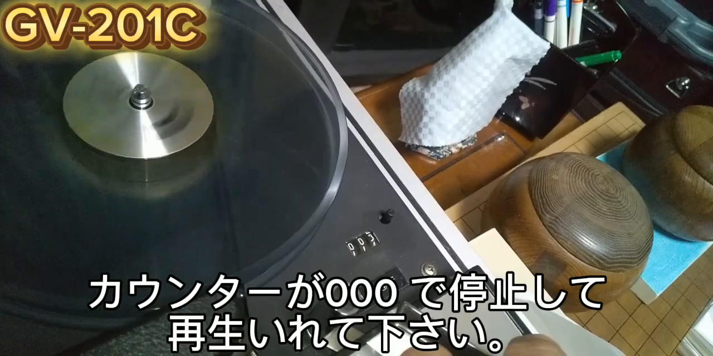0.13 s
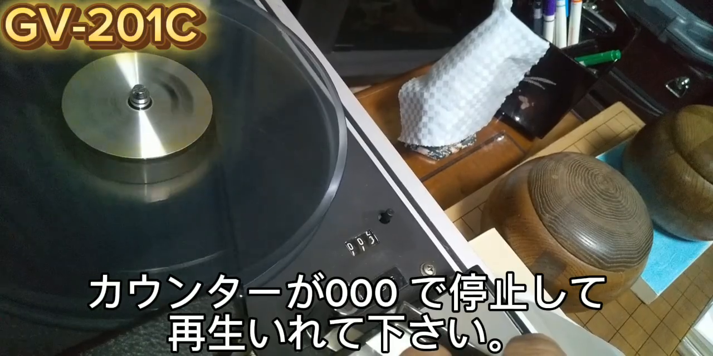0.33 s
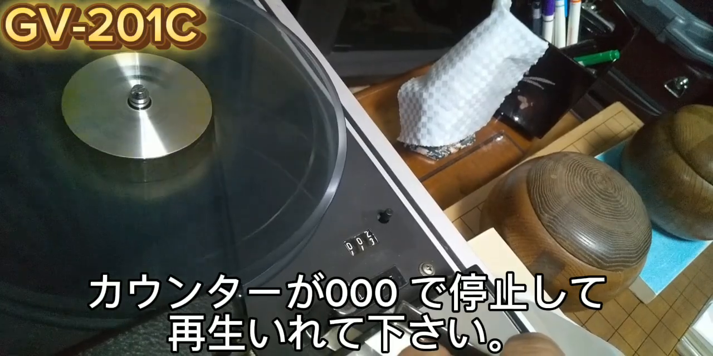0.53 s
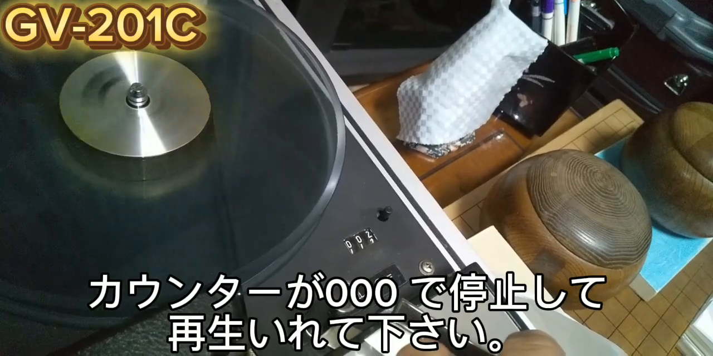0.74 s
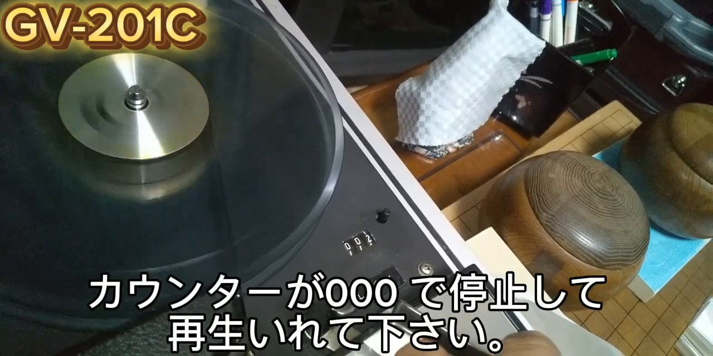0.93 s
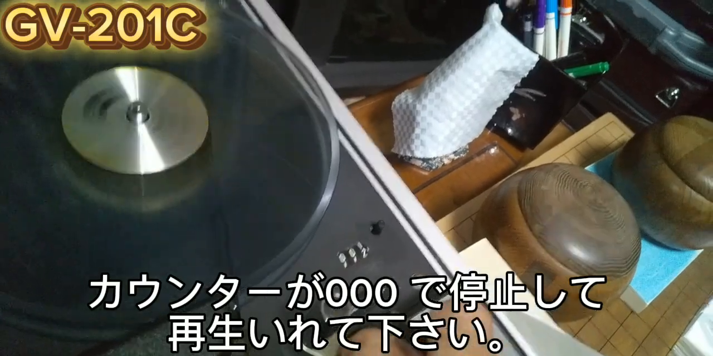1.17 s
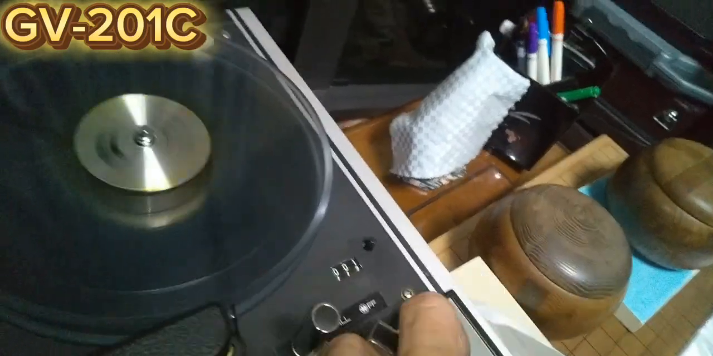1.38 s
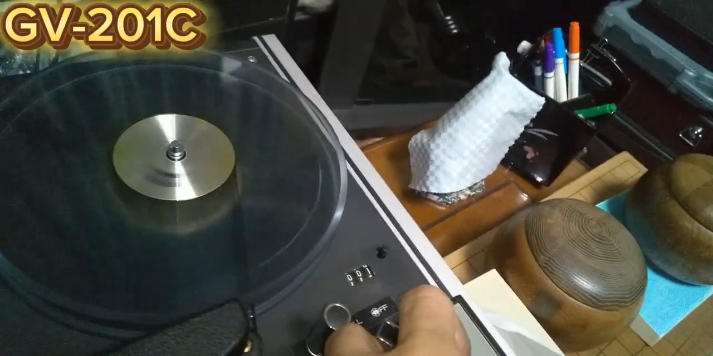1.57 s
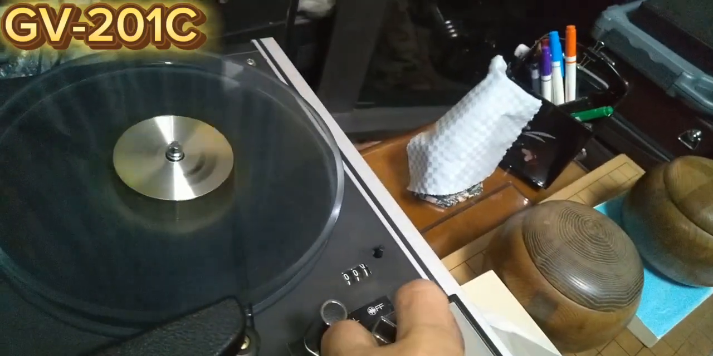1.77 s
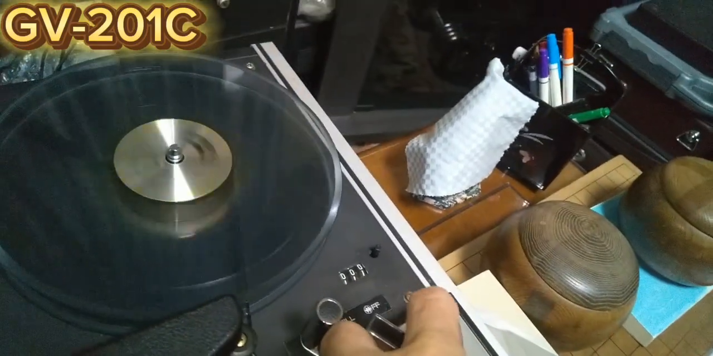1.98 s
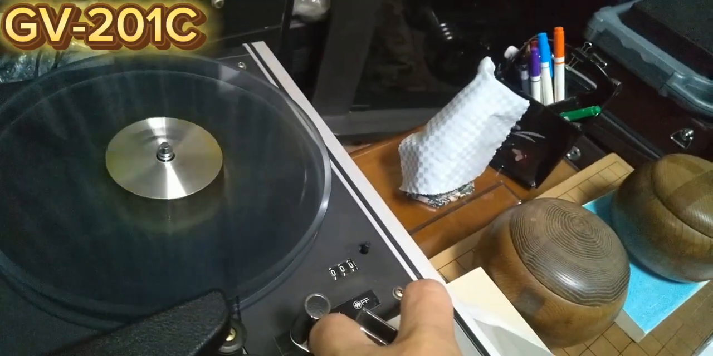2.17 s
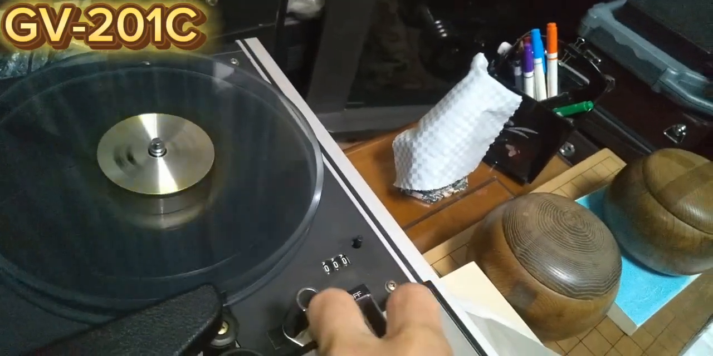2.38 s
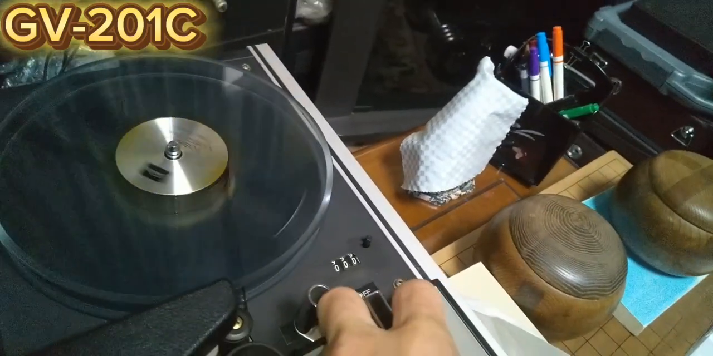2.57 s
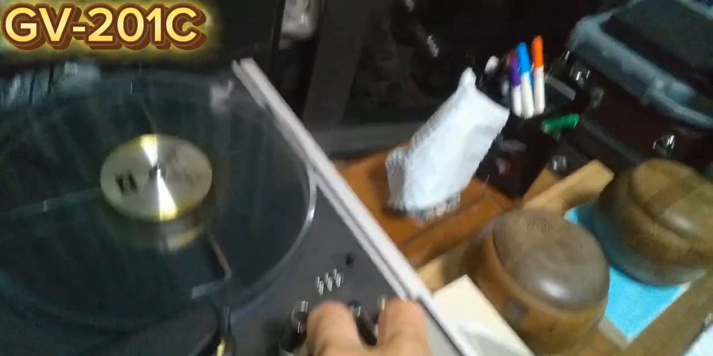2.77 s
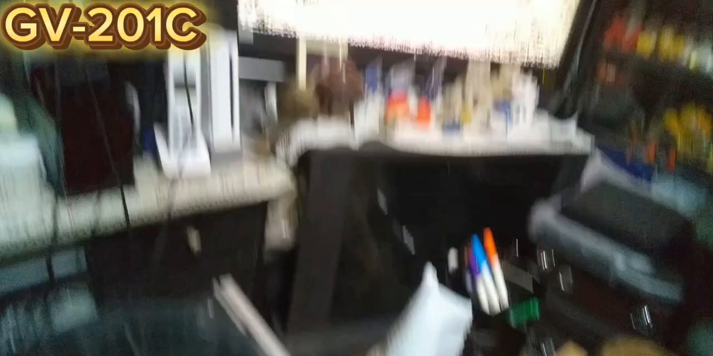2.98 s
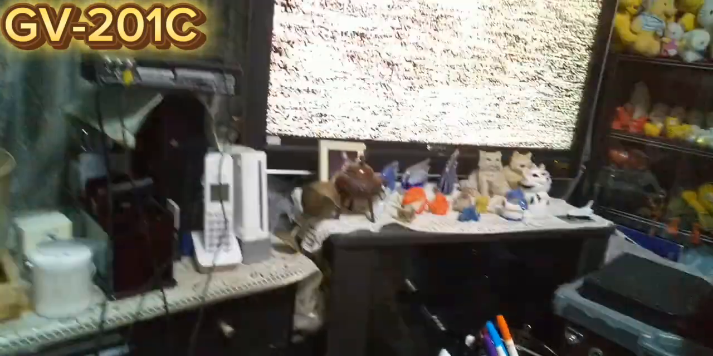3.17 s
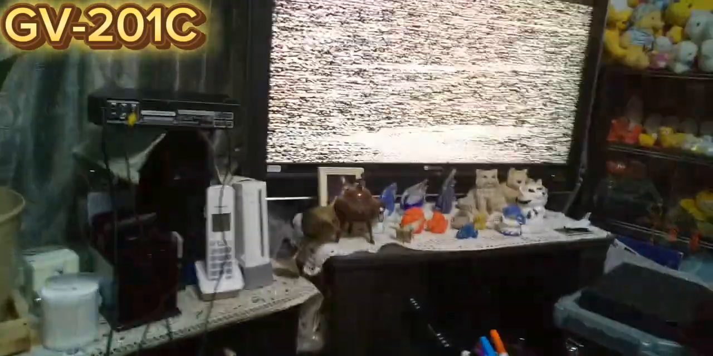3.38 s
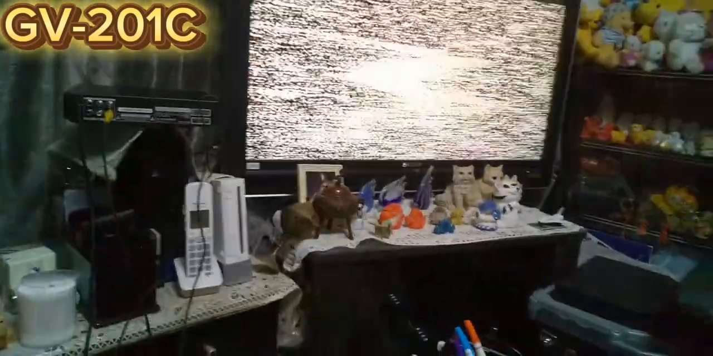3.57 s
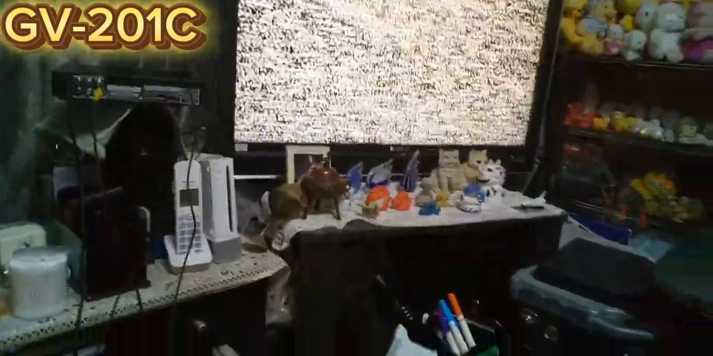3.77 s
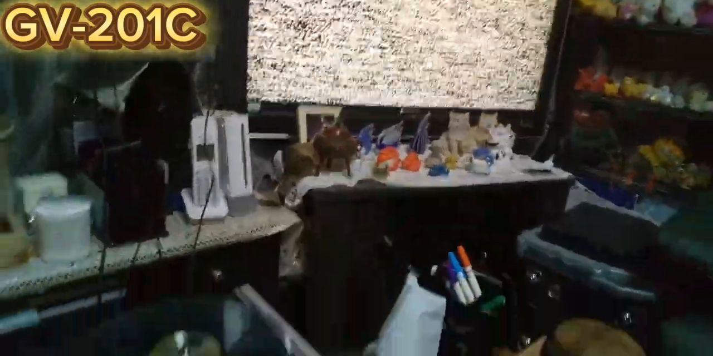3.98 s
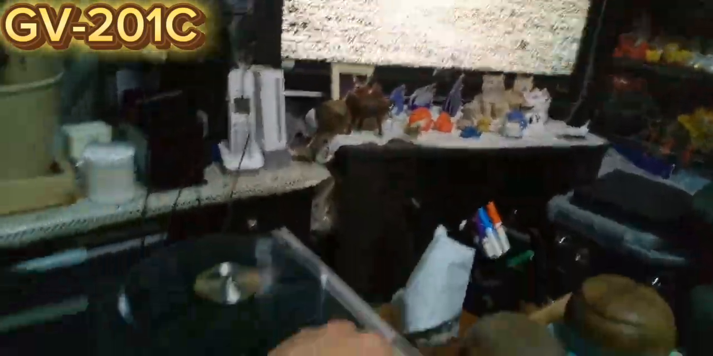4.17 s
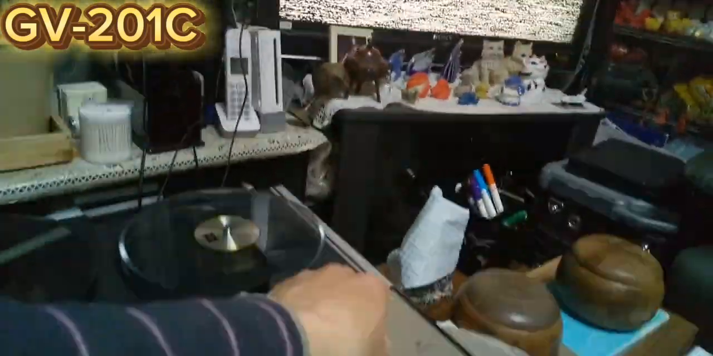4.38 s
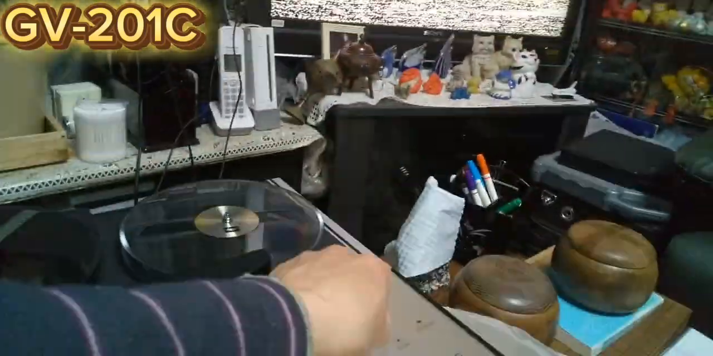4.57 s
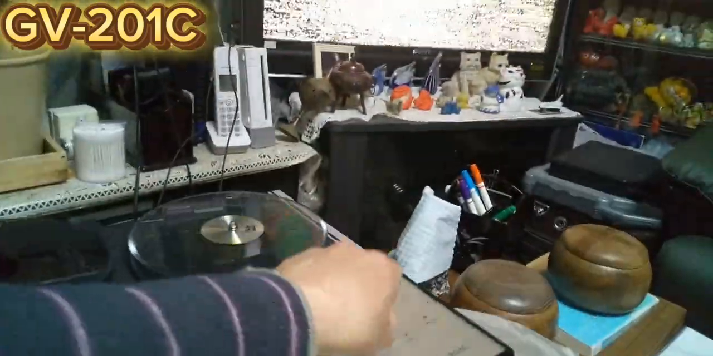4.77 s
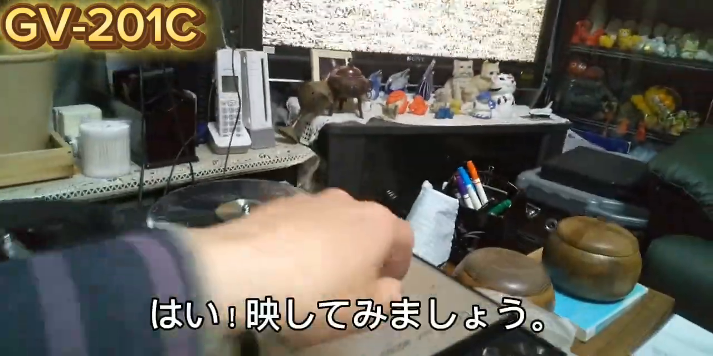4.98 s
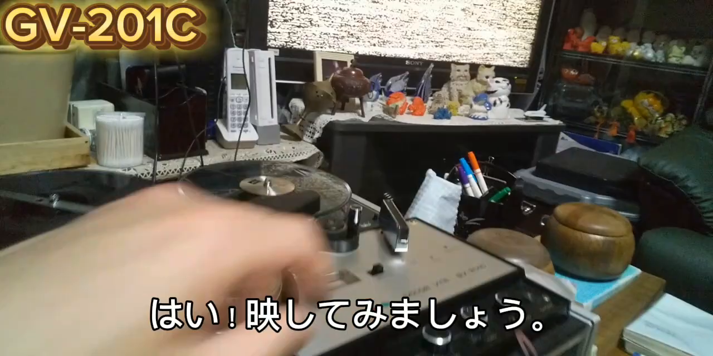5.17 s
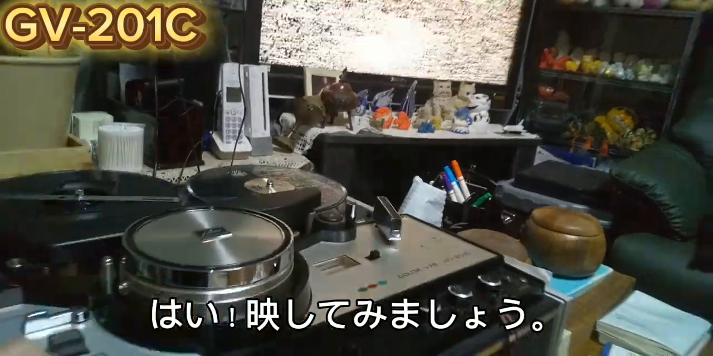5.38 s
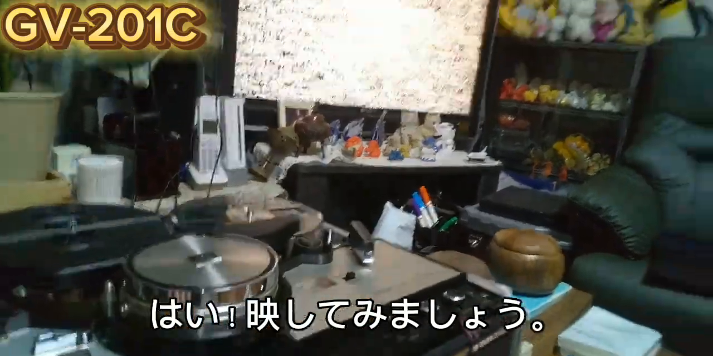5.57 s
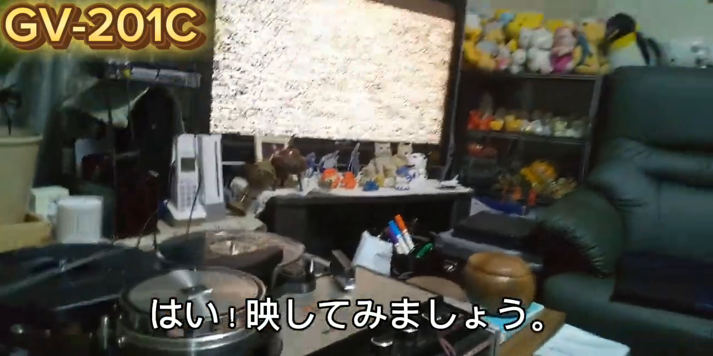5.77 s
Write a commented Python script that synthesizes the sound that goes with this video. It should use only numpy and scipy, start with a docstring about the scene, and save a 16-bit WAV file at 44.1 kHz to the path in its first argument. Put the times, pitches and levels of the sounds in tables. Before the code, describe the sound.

Fast reel whir flutters close by, then a sharp metallic stop clack, a winding-down, a second clack, and quiet motor running.

```python
"""A fluttering whir of rewinding reels, two clacks of a lever (stop, then play), then a quieter whine and ticking.
The source is an open-reel tape machine close to a hand-held microphone, which swings away, in a small furnished room.
Whir: filtered noise pulsed by tape flaps, then by head-drum ticks. Whine and gears: sines that follow motor speed.
Clacks: bursts of contact noise that excite panels, case and chassis modes, with decaying noise as the room's echo.
Dull knocks of the hand reach the microphone through its body."""
import sys
import numpy as np
from scipy import signal
from scipy.fft import rfft, irfft
from scipy.io import wavfile
from scipy.ndimage import uniform_filter1d

SR = 44100
rng = np.random.default_rng(int(sys.argv[2]) if len(sys.argv) > 2 else 0)


def unload_audio(sound):
    """Save the sound as a 16-bit wav file, at the path given as the first command line argument."""
    columns = np.transpose(np.atleast_2d(sound))
    # keep every value between -1 and 1, then stretch to whole-number steps
    steps = np.round(np.clip(columns, -1, 1) * 32767)
    wavfile.write(sys.argv[1], SR, steps.astype(np.int16))


def convert_level_to_amplitude(level_db):
    """Map a level in decibels to its linear amplitude factor."""
    exponent = np.asarray(level_db, float) / 20
    return 10 ** exponent


N = 257103
T = np.arange(N) / SR

# how near the microphone hears the running machine: time_s, gain_db
NEAR = [(0, 0), (1.5, -1), (2.3, -2), (2.9, -2), (3.38, -3.5), (3.65, -1), (4.6, -2.5), (5.2, -3),
        (5.83, -5)]


def columns(table):
    """Linear interpolation: each column of a time curve becomes one value per sample."""
    s, *cols = np.transpose(table)
    return [np.interp(T, s, c) for c in cols]


def colour(x, points, lifts=()):
    """Spectral shaping: gain through (Hz, dB) points, plus resonances of (Hz, width Hz, dB)."""
    hz = np.arange(len(x) // 2 + 1) * SR / len(x) + 1  # 1 Hz up, to keep the logarithm finite
    point_hz, point_db = np.transpose(points)
    gain_db = np.interp(np.log(hz), np.log(point_hz), point_db)
    for centre_hz, width_hz, lift_db in lifts:
        gain_db = gain_db + lift_db / (1 + (2 * (hz - centre_hz) / width_hz) ** 2)
    return irfft(rfft(x) * convert_level_to_amplitude(gain_db), len(x))


def band(x, lo_hz, hi_hz):
    """Zero-phase filtering: a steep band-pass run both ways, so without delay."""
    return signal.sosfiltfilt(signal.butter(3, [lo_hz, hi_hz], "band", fs=SR, output="sos"), x)


def unit(x):
    """Normalization: scale to rms 1."""
    return x / np.sqrt(np.mean(x ** 2))


def walk(rate):
    """Smoothed random modulation: levels held 1 / rate s and slewed twice; spread near 1."""
    hold = int(SR / rate)
    steps = np.repeat(rng.standard_normal(N // hold + 1), hold)
    return 1.3 * uniform_filter1d(uniform_filter1d(steps, hold), hold)[:N]


def puffs(rate, first_s, decay_s, scatter_db, weak_db):
    """Periodic excitation: an envelope jumps once a cycle and dies away; every other jump is offset by weak_db."""
    turns = np.cumsum(rate) / SR
    turns = turns - turns[int(first_s * SR)]
    cycle = np.floor(turns).astype(int)
    size_db = scatter_db * rng.standard_normal(1000)[cycle % 1000] + weak_db * (cycle % 2)
    since_s = (turns - cycle) / rate
    return convert_level_to_amplitude(size_db) * np.exp(-since_s / decay_s)


def mode(x, hz, t60):
    """Modal resonance: a one-pole complex resonator whose ringing falls 60 dB in t60 s."""
    pole = np.exp(2j * np.pi * hz / SR - np.log(1000) / (t60 * SR))
    return signal.lfilter([1], [1, -pole], x).imag


def whir(reel, flaps, ticks):
    """Friction noise through deck resonances: bearings and tape rub, amplitude-modulated by flaps or drum ticks."""
    # colour of the whir before each band is levelled: frequency_hz, gain_db
    rewind_colour = [(15, -47), (25, 7.5), (71, -1), (154, -10.5), (277, -5.5), (414, -15.5), (745, -8),
                     (1110, -14.5), (1530, -9), (1850, -15), (2690, -14), (5830, -14), (7030, -13),
                     (13000, -20.5), (14900, -17)]
    play_colour = [(15, -36), (25, 7), (65, -1), (146, -3), (206, -9.5), (317, 1), (448, -13), (745, 4.5),
                   (947, -5), (1530, 4.5), (1710, -8), (5530, -20), (6850, -19.5), (13700, -36),
                   (14900, -28)]
    # deck resonances lifted out of the whir: frequency_hz, width_hz, rewind_lift_db, play_lift_db
    deck = [(308, 160, 0, 0.5), (697, 47, -4, -27), (1324, 9.9, 0, 7), (1470, 260, -0.5, -4.5),
            (2403, 990, 4.5, 2.5), (2760, 62, 4, -5), (3180, 26, 7, -5), (3580, 140, 2.5, 8.5),
            (7000, 630, 3, 1), (11200, 600, 1, 4), (12900, 710, 2.5, 8)]
    # bands of the whir, levels before nearness and flicker:
    # low_hz, high_hz, rewind_db, idle_db, play_db, tick_depth (ratio), flicker_db
    bands = [(25.2, 804, -48.5, -50, -50.5, 0.23, 2.34), (563, 1860, -47.5, -51.5, -56.5, 2.2, 0.86),
             (1670, 4390, -45.5, -55, -56, 0.88, 0.23), (4290, 7880, -56.5, -64.5, -60, 1.5, 2.4),
             (8450, 16300, -58, -71.5, -66, 1.4, 0.1)]
    # rms of flapping over that of steady rubbing in each band, low to high: ratio
    flap_depth = [0, .25, .82, .75, .3]
    play_s = 3.42  # play engaged

    noise = rng.standard_normal((4, N))
    rewind = colour(noise[0], rewind_colour, [(hz, width, lift) for hz, width, lift, _ in deck])
    play = colour(noise[1], play_colour, [(hz, width, lift) for hz, width, _, lift in deck])
    # each flap rings the deck more sharply than the steady rubbing does
    sharp_deck = [(hz, width, 2.5 * lift) for hz, width, lift, _ in deck]
    flapping = colour(noise[3] * flaps, rewind_colour, sharp_deck)
    rings = sum(mode(noise[2] * flaps, hz, .035) for hz in (2740, 3110, 3430, 4200))
    flapping = unit(band(flapping, 600, 15000)) + .6 * unit(rings)

    out = 0
    for (lo, hi, rewind_db, idle_db, play_db, tick_depth, flicker_db), depth in zip(bands, flap_depth):
        fast = unit(unit(band(rewind, lo, hi)) + depth * unit(band(flapping, lo, hi)))
        slow = unit(band(play, lo, hi) * (1 + tick_depth * ticks))
        slow = slow * convert_level_to_amplitude(np.where(T < play_s, idle_db, play_db))
        # rewinding gives way to the slower running as the reels halt
        mixed = reel * convert_level_to_amplitude(rewind_db) * fast + np.sqrt(1 - reel) * slow
        out = out + convert_level_to_amplitude(flicker_db * walk(14)) * mixed
    return out * convert_level_to_amplitude(columns(NEAR)[0])


def tape_flaps():
    """Periodic impact: the tape flaps on a guide, each flap a sudden rise and a short decay."""
    # rate of flapping while rewinding: time_s, flaps_per_s
    flap_rate = [(0, 39.85), (1.3, 39.8), (1.8, 39.4), (2.2, 38.8)]
    return puffs(columns(flap_rate)[0], .2105, .0036, scatter_db=1.0, weak_db=0)


def drum_ticks(speed):
    """Rotary excitation: the head drum ticks once a turn, alternate ticks weaker, in step with motor speed."""
    turns_per_s = 53.45 * speed
    before = puffs(turns_per_s, 2.8105, .0015, scatter_db=2, weak_db=-3)
    after = puffs(turns_per_s, 4.444, .0015, scatter_db=2, weak_db=-2.5)
    return np.where(T < 3.4, before, after)


def swells(reel, flaps, ticks):
    """Band-limited noise: narrow bands of the whir swell and fade; those above 4 kHz pulse with flaps or ticks."""
    # passing swells: start_s, end_s, centre_hz, width_hz, level_db (at the height of the swell)
    swell_rows = [(-.5, 1.1, 1570, 250, -51), (0, 1, 10800, 900, -65), (0, 1.1, 5550, 1500, -59),
                  (1.05, 1.7, 12300, 1200, -63), (1.304, 2.2, 4850, 600, -60.5),
                  (2.538, 2.63, 12800, 2400, -60), (2.545, 2.62, 6800, 2000, -55),
                  (3.65, 3.817, 10900, 2200, -64), (3.854, 4.25, 6800, 1400, -60.5),
                  (3.96, 4.07, 10500, 2000, -68), (4.393, 5, 6700, 1600, -66.5),
                  (4.925, 5.3, 10000, 1500, -67), (5.15, 5.66, 2355, 240, -57),
                  (5.6, 5.83, 10200, 1497, -71.5)]
    noise = rng.standard_normal(N)
    beating = noise * (.2 + np.where(reel > 0, flaps, 1.5 * ticks))
    out = np.zeros(N)
    for start, end, hz, width, db in swell_rows:
        rise_and_fall = np.sin(np.pi * np.clip((T - start) / (end - start), 0, 1))
        source = beating if hz > 4000 else noise
        out += convert_level_to_amplitude(db) * rise_and_fall * unit(band(source, hz - width / 2, hz + width / 2))
    return out


def tones(reel, speed):
    """Rotating-machine tones: a beating whine, its lower neighbour and gear tones waver and follow motor speed."""
    # whine levels (before beating and wavering): time_s, whine_db, lower_db (the tone just below it)
    whine_curve = [(0, -55.5, -63), (1.1, -52.5, -65), (1.75, -49.5, -59.5), (2.25, -53, -64.5),
                   (2.49, -56, -65), (2.6, -44.5, -58), (2.8, -48.5, -56), (3.2, -51, -57.5),
                   (3.38, -60.5, -62), (3.8, -51.5, -57.5), (4.5, -49.5, -57), (5.1, -57, -56),
                   (5.83, -62, -79)]
    # steady gear and motor tones (at speed 1, before nearness and wavering): pitch_hz, rewind_db, play_db
    gear_tones = [(61, -59, -63), (187, -68, -69), (211.5, -67.5, -60.5), (296.1, -63, -77),
                  (733, -55.5, -62), (950, -64.5, -70), (1228, -60, -64.5), (1497, -51.5, -76),
                  (1504, -72, -62.5), (1591, -56.5, -76), ]
    whine_db, lower_db = columns(whine_curve)
    turns = np.cumsum(speed) / SR  # seconds of running at speed 1
    # two whines of nearly the same pitch beat: a deep dip every .672 s, one of them at 2.825 s
    beat = np.abs(1 - .9 * np.exp(2j * np.pi * (T - 2.825) / .672))
    out = beat * convert_level_to_amplitude(whine_db + 1.5 * walk(30)) * np.sin(2 * np.pi * 753.7 * turns)
    out += convert_level_to_amplitude(lower_db + 3 * walk(12)) * np.sin(2 * np.pi * 705 * turns)
    near_db = columns(NEAR)[0]
    for hz, rewind_db, play_db in gear_tones:
        db = play_db + reel * (rewind_db - play_db) + near_db + 2.44 * walk(20)
        out = out + convert_level_to_amplitude(db) * np.sin(2 * np.pi * (hz * turns + rng.random()))
    return np.sqrt(2) * out  # levels are rms


def lever():
    """Impact excitation: a few ms of rattling contact give a crack with a fizz on top, ringing panels, a case thud."""
    # the lever scrapes up to each clack: start_s, end_s, drive_db (reached at the end, before the crack's colour)
    scrapes = [(2.348, 2.369, -21), (3.403, 3.415, -30)]
    # colour of the crack of metal on metal: frequency_hz, gain_db
    crack_colour = [(710, -8), (1200, 2), (2140, -3.5), (2320, -1), (2530, -1.5), (6880, -8.5), (8000, -17),
                    (10400, -27.5), (17600, -120)]
    crack, panel, case, fizz = np.zeros((4, N))
    after = np.arange(1500) / SR
    blows = contacts()
    rattle = rng.standard_normal((len(blows), 1500)) * (1 - np.exp(-after / 0.00066))
    for (s, crack_db, panel_db, case_db, fizz_db), grit in zip(blows, rattle):
        at = slice(int(s * SR), int(s * SR) + 1500)
        crack[at] += convert_level_to_amplitude(crack_db) * grit * np.exp(-after / 0.0048)
        panel[at] += convert_level_to_amplitude(panel_db) * grit * np.exp(-after / 0.0032)
        fizz[at] += convert_level_to_amplitude(fizz_db) * grit * np.exp(-after / 0.0056)
        case[at] += convert_level_to_amplitude(case_db) * after / 0.0006 * np.exp(-after / 0.00072)
    for start, end, db in scrapes:
        growth = np.where(T < end, np.clip((T - start) / (end - start), 0, 1), 0)
        crack += convert_level_to_amplitude(db) * rng.standard_normal(N) * growth

    ring = convert_level_to_amplitude(-3.0) * band(panel, 550, 1500) + convert_level_to_amplitude(-22) * band(case, 140, 200)
    ring = ring + chassis(crack, panel, case)
    ring = ring + convert_level_to_amplitude(5.0) * colour(crack, crack_colour) + convert_level_to_amplitude(7.5) * band(fizz, 9300, 16300)
    # loose parts shiver on densely after every blow
    shiver_s = np.arange(6000) / SR
    shiver = rng.standard_normal(6000) * np.exp(-np.log(1000) * shiver_s / 0.1)
    ring = ring + convert_level_to_amplitude(-32.5) * signal.fftconvolve(ring, shiver)[:N]
    # high-pass at 75 Hz: keeps the clacks free of deep bass
    return signal.sosfilt(signal.butter(2, 75, "high", fs=SR, output="sos"), ring)


def contacts():
    """Repeated impact: rows (s, crack, panel, case, fizz dB) of firm blows and of the weakening chance bounces."""
    # firm blows of lever and linkage: time_s, crack_db (drive), weight_db (panel drive re crack)
    firm = [(2.37, -2.5, -8), (2.3772, -2, 1.5), (2.3801, -6, 5.5), (2.409, -9, -4), (2.5483, -33.5, 4),
            (2.5817, -33.5, 6), (2.6574, -35, 1), (3.4123, -14.5, -2), (3.4168, -6, -4), (3.4202, -6, 1),
            (3.526, -34, 6)]
    # the linkage chatters on after each clack: start_s, first_db (crack drive), fall_db_per_s, weight_db (re crack)
    chatter = [(2.384, -11.5, 214, -5.5), (3.424, -9.5, 391, 1.5)]
    bounces, gap_s, scatter_db = 18, .005, 3.5
    case_db = -12.5  # thud in the case re panels

    def fizz_db(s):
        """Contact brightness: fizz re crack at stop and at play."""
        return -21.5 if s > 3 else -18

    rows = [(s, db, db + weight, db + weight + case_db, db + fizz_db(s)) for s, db, weight in firm]
    for start, first_db, fall_db, weight_db in chatter:
        chance = rng.random((bounces, 3))
        late = gap_s * (np.arange(bounces) + chance[:, 0])
        db = first_db - fall_db * late + 2 * scatter_db * (chance[:, 1] - .5)
        panel_db = db + weight_db + 2 * scatter_db * (chance[:, 2] - .5)
        dulling_db = 250 * late  # the fizz dulls over the bounces
        rows += zip(start + late, db, panel_db, panel_db + case_db, db + fizz_db(start) - dulling_db)
    return rows


def chassis(crack, panel, case):
    """Modal synthesis: the case drives the low modes, the panels the middle ones and the crack the high ones."""
    # chassis modes, levels re the scaled drive: frequency_hz, stop_db, play_db, t60_s
    modes = [(89, -13, -9, 0.51), (127, -7, -10, 0.48), (157.6, 7.5, 0, 0.164), (295.8, -8, -2.5, 0.43),
             (349.7, 1.5, 16, 0.15), (597, -32, -31, 0.043), (769, -3.5, -6, 0.067),
             (866, 1.5, -1.5, 0.041), (1000, -2.5, -1, 0.019), (1100, -9.5, -6, 0.031), (2545, -3, -4, .22),
             (2230, -3, -19, 0.031), (3130, -2, -24, 0.11), (4500, 7, -21, 0.027), (6850, -14, -3, 0.038)]
    ring = np.zeros(N)
    for hz, stop_db, play_db, t60 in modes:
        if hz < 500:
            drive = convert_level_to_amplitude(-38) * case
        elif hz < 1600:
            drive = convert_level_to_amplitude(-26) * panel
        else:
            drive = convert_level_to_amplitude(-45) * crack
        ring += mode(drive * convert_level_to_amplitude(np.where(T < 3, stop_db, play_db)), hz, t60)
    return ring


def bumps():
    """Structure-borne sound: soft bumps of the hand send short dull knocks through the microphone's body."""
    # bumps: time_s, level_db (roughly the peak), pitch_hz
    knocks = [(3.028, -54, 86.1), (3.081, -41, 119), (3.253, -46, 127), (3.841, -39, 88.6)]
    out = np.zeros(N)
    after = np.arange(4000) / SR
    for s, db, hz in knocks:
        shape = np.sin(2 * np.pi * hz * after) * (1 - np.exp(-after / 0.0015)) * np.exp(-after / 0.0073)
        out[int(s * SR):int(s * SR) + 4000] += convert_level_to_amplitude(db + 3.5) * shape  # 3.5 dB offsets the envelope's loss
    return out


def room(x):
    """Reverberation: convolution with dense noise echoes that fade exponentially, the treble first."""
    t60_s, level_db = 0.77, -23.5
    after = np.arange(int(.6 * SR)) / SR
    noise = rng.standard_normal((2, len(after)))
    fade = np.exp(-np.log(1000) * after / t60_s) * (1 - np.exp(-after / 0.0046))
    treble = 0.67 * band(noise[1], 5900, 19000) * np.exp(-after / 0.32)
    tail = fade * (band(noise[0], 55, 7400) + treble)
    return convert_level_to_amplitude(level_db) * signal.fftconvolve(x, tail / np.sqrt(np.sum(tail ** 2)))[:N]


def patchy_treble(mono):
    """Phase randomization: short patches of the treble, picked by chance, are given random phase."""
    hz, _, spec = signal.stft(mono, SR, nperseg=2048)
    # each patch spans about 700 Hz and two frames
    chance = rng.random((40, spec.shape[1] // 2 + 1))
    patch = chance[(hz // 700).astype(int)][:, np.arange(spec.shape[1]) // 2]
    share = np.clip((hz - 3800) / 5500, 0, .88)[:, None]
    turned = spec * (patch < share) * np.exp(2j * np.pi * rng.random(spec.shape))
    return convert_level_to_amplitude(-4.5) * signal.istft(turned, SR, nperseg=2048)[1][:N]


def scene():
    """Superposition: one mono sum, a little random-phase treble added to one channel, subtracted from the other."""
    # pitch of the whine, sagging while the lever loads the motor: time_s, pitch_hz
    motor = [(0, 754.5), (2.3, 754), (2.55, 753), (3.05, 752), (3.2, 742), (3.36, 718), (3.55, 745),
             (3.8, 754), (5.83, 754.5)]
    stop_s, coast_s = 2.434, 0.37  # brake on, time the reels take to halt
    reel = np.clip(1 - (T - stop_s) / coast_s, 0, 1)  # share of full rewind speed
    speed = columns(motor)[0] / 753.7
    flaps, ticks = tape_flaps(), drum_ticks(speed)
    running = whir(reel, flaps, ticks) + swells(reel, flaps, ticks)
    clacks = lever()
    mono = running + tones(reel, speed) + clacks + room(clacks) + bumps()
    side = patchy_treble(running + convert_level_to_amplitude(-6) * clacks)
    return np.array([mono + side, mono - side])


def roll_off(x):
    """The treble ends steeply here."""
    return signal.sosfilt(signal.butter(12, 15010, fs=SR, output="sos"), x)


def record(dry):
    """Transducer limits: the microphone rounds the loudest peaks by saturation and loses deep bass and the top."""
    rounded = np.tanh(dry)
    x = signal.sosfilt(signal.butter(3, 52, "high", fs=SR, output="sos"), rounded)
    mix = signal.sosfilt(signal.ellip(10, .3, 45, 14320, fs=SR, output="sos"), x)
    return roll_off(mix)


dry = scene()
out = record(dry)
unload_audio(out)
```